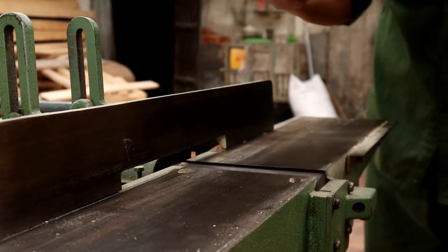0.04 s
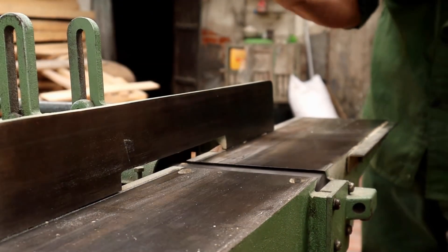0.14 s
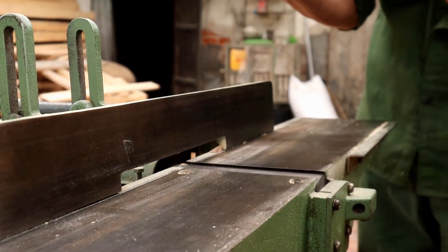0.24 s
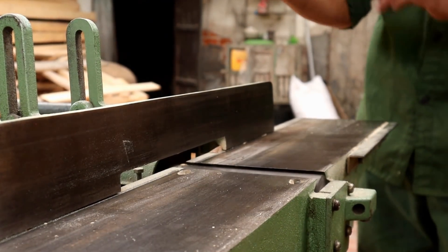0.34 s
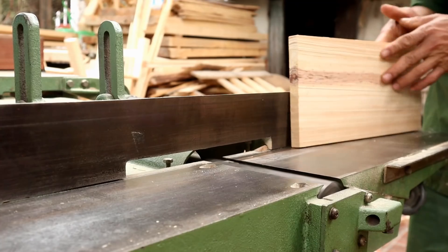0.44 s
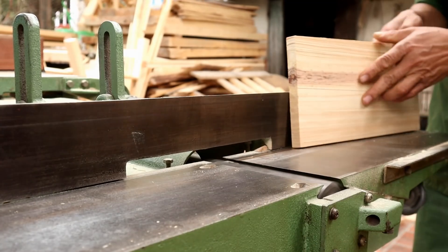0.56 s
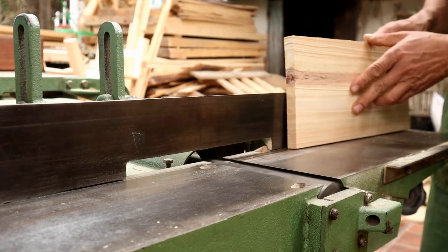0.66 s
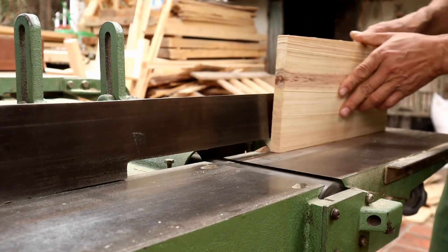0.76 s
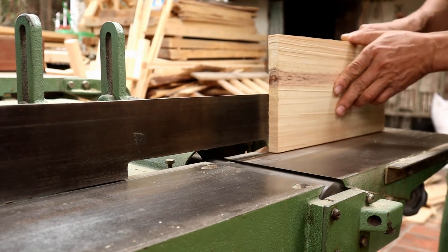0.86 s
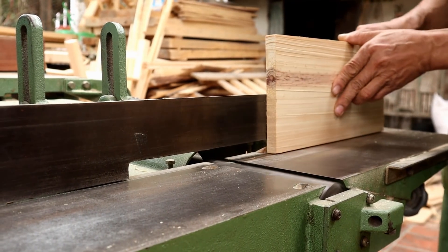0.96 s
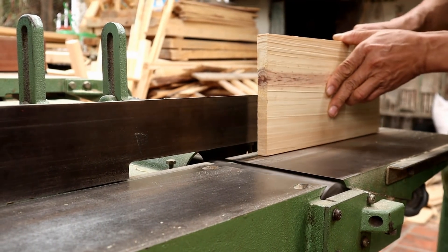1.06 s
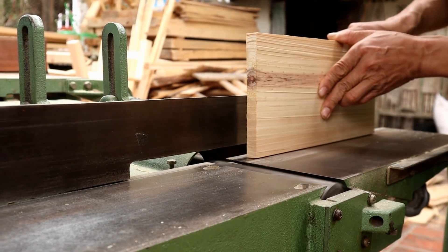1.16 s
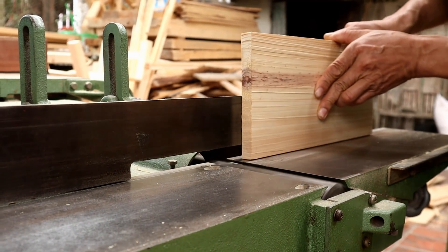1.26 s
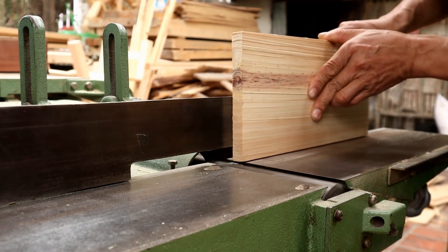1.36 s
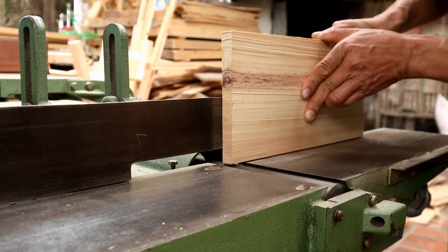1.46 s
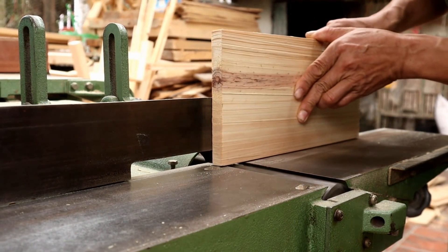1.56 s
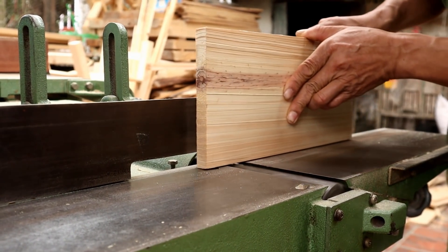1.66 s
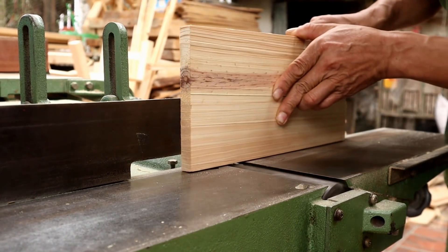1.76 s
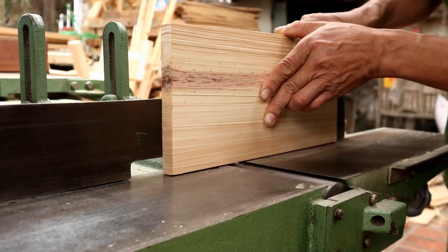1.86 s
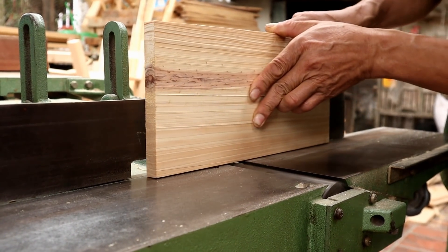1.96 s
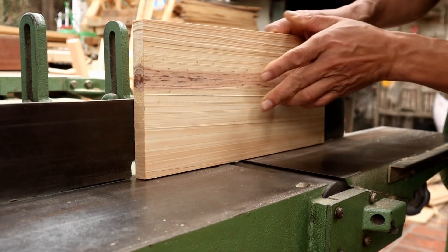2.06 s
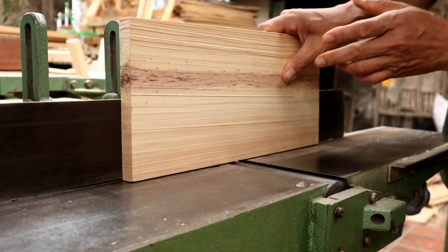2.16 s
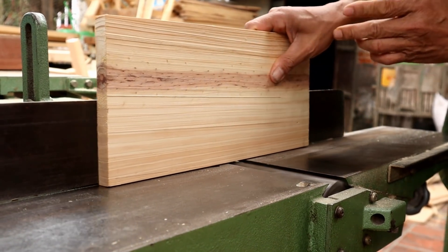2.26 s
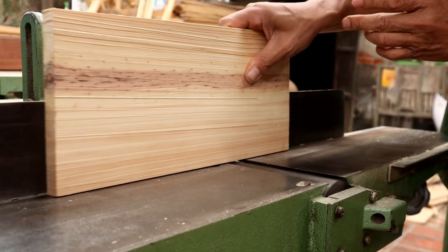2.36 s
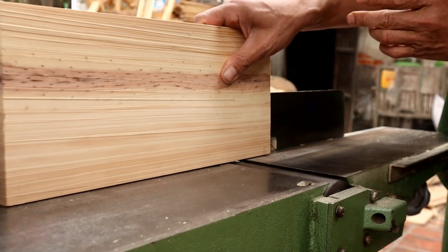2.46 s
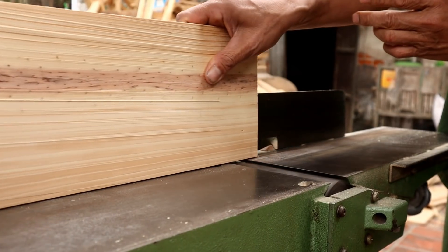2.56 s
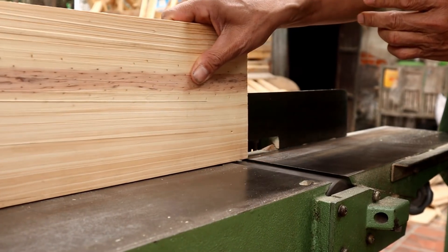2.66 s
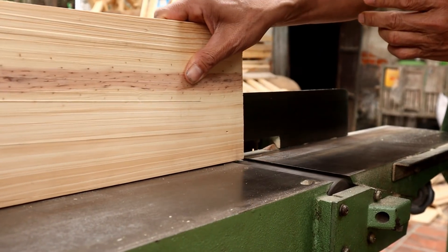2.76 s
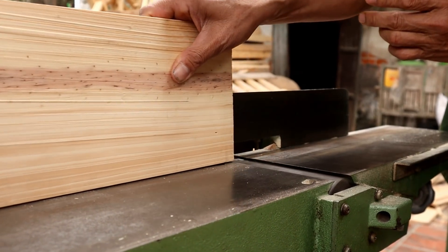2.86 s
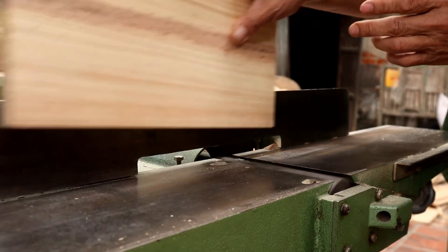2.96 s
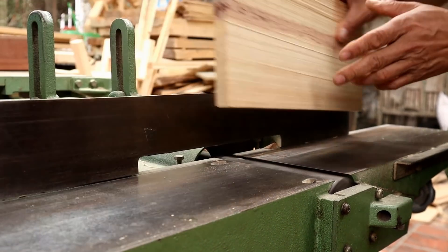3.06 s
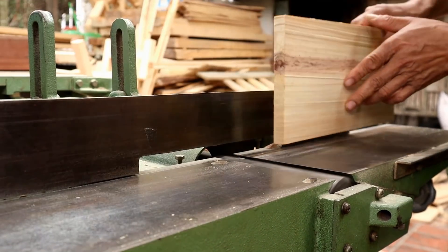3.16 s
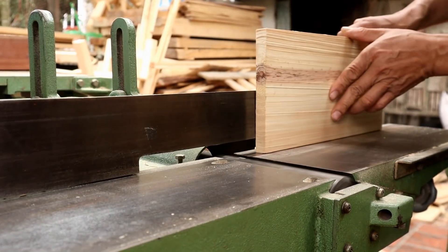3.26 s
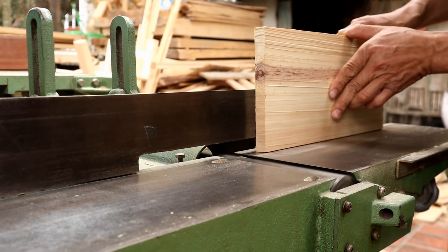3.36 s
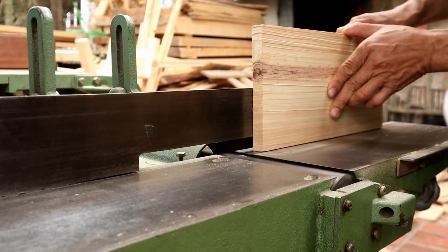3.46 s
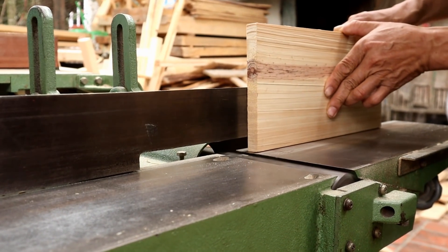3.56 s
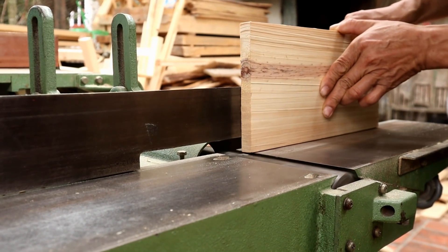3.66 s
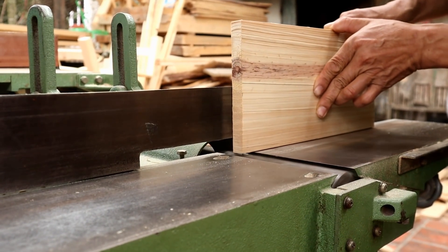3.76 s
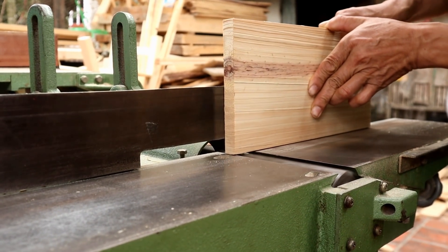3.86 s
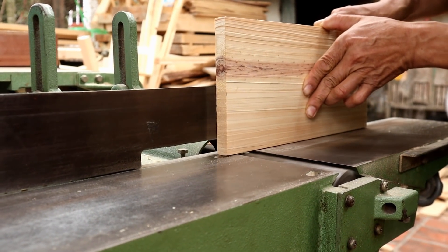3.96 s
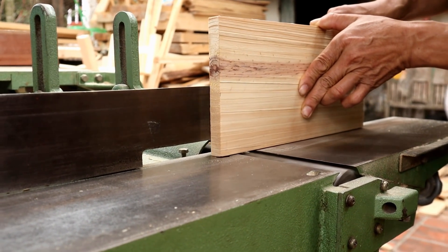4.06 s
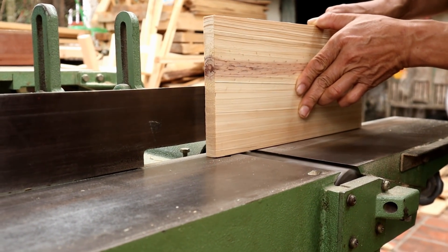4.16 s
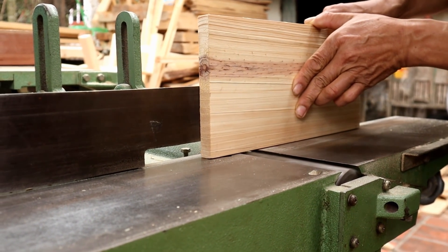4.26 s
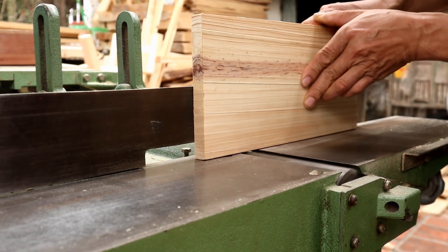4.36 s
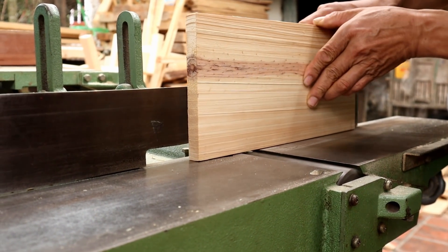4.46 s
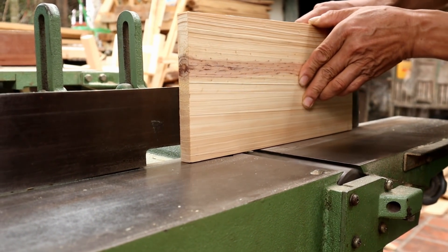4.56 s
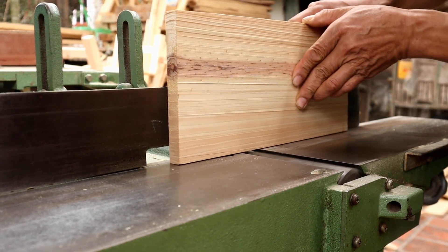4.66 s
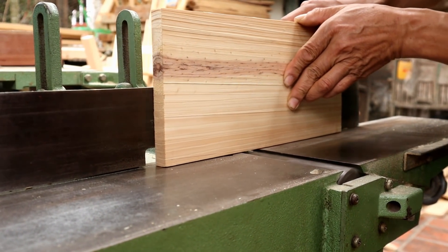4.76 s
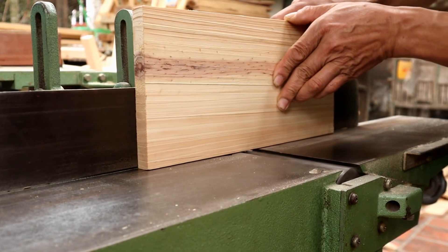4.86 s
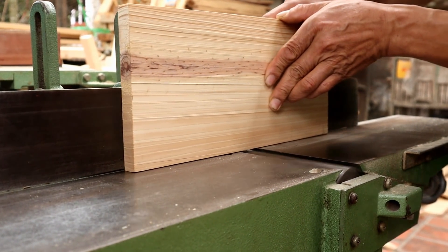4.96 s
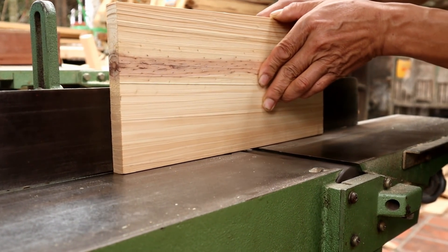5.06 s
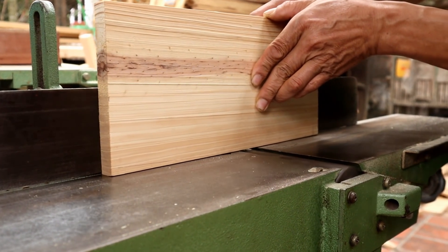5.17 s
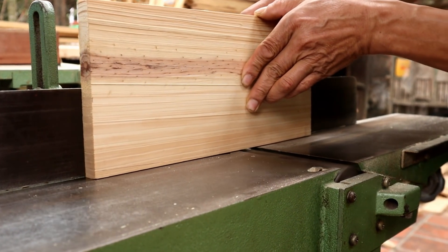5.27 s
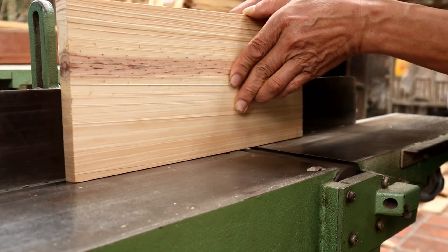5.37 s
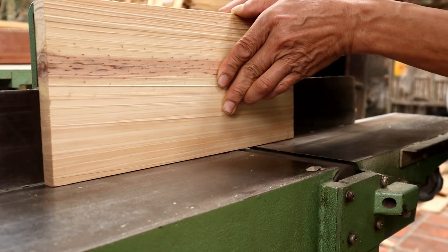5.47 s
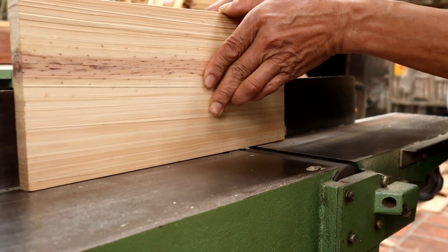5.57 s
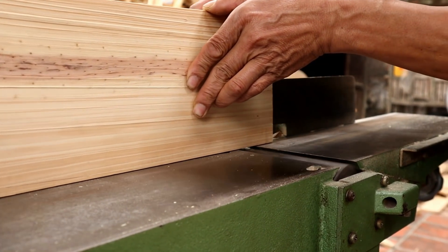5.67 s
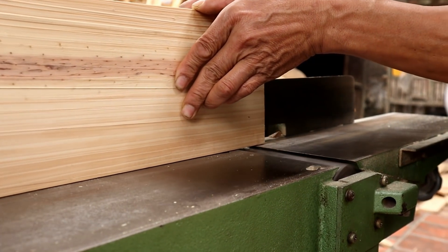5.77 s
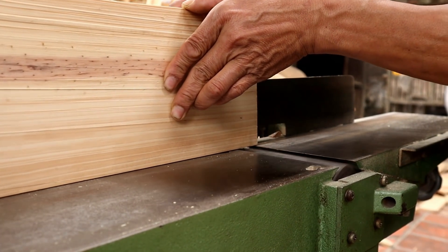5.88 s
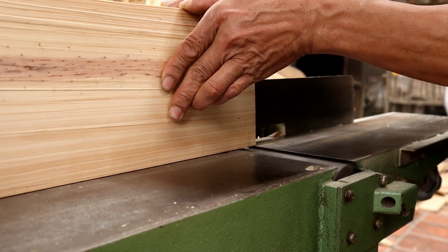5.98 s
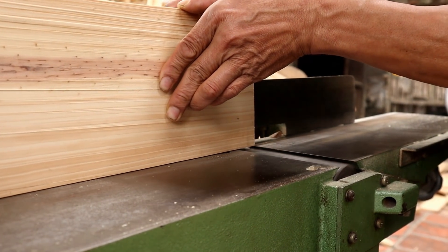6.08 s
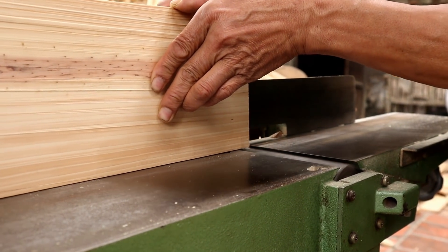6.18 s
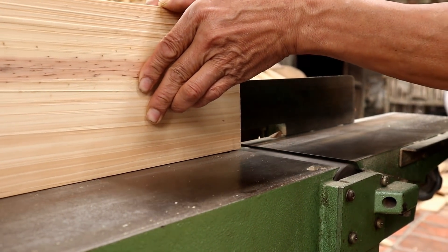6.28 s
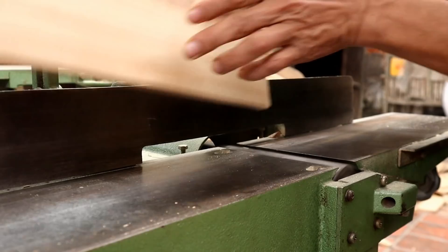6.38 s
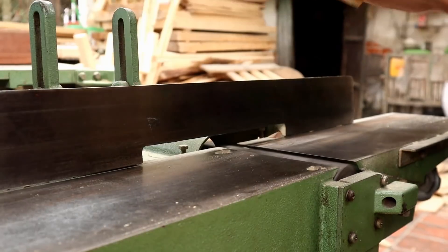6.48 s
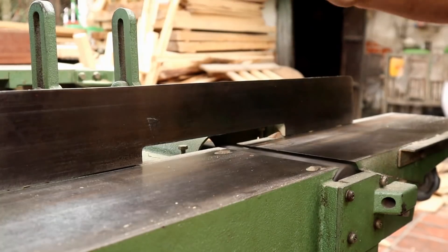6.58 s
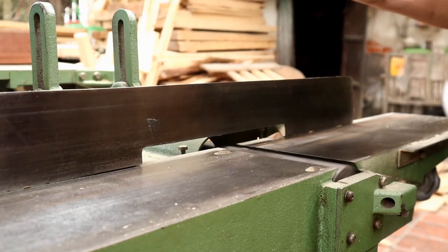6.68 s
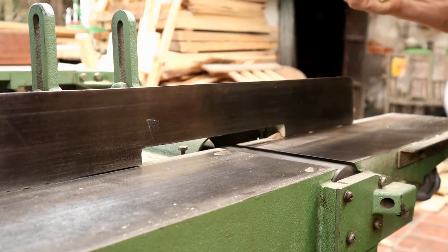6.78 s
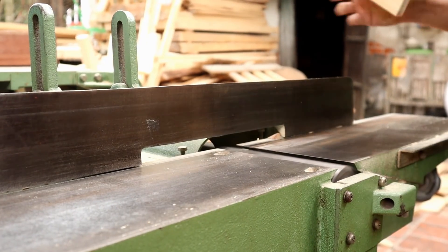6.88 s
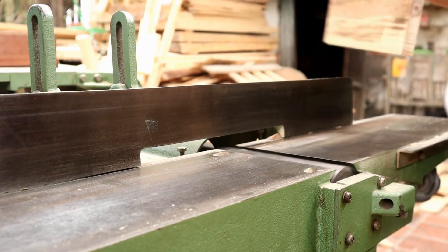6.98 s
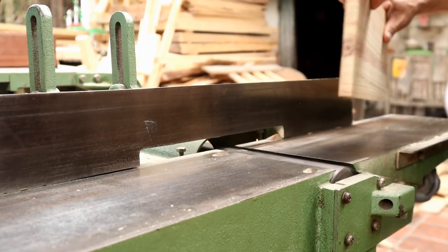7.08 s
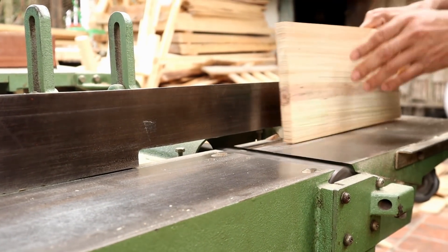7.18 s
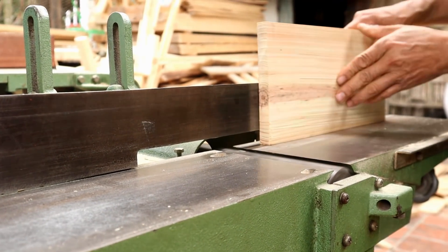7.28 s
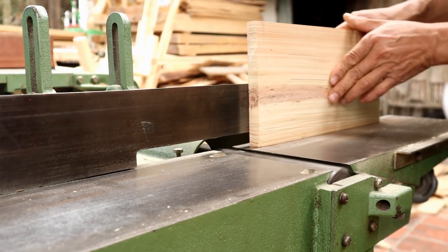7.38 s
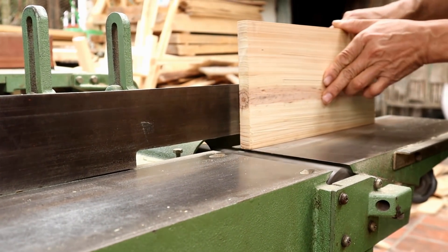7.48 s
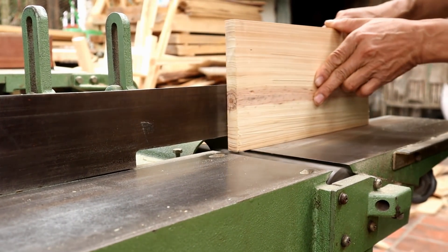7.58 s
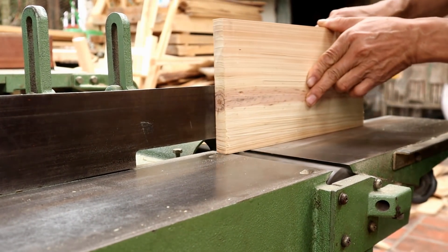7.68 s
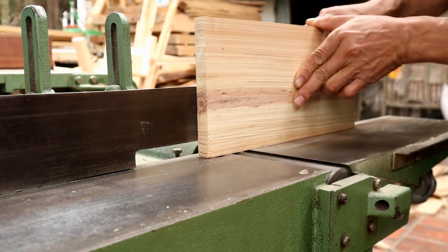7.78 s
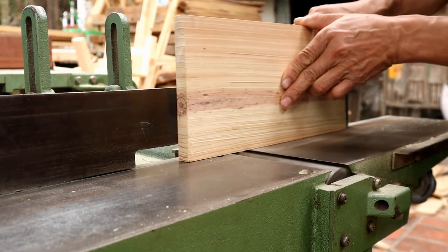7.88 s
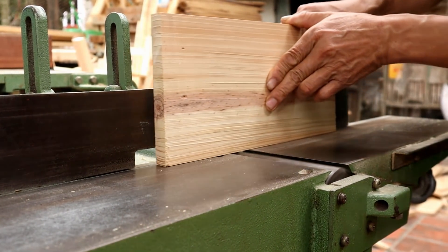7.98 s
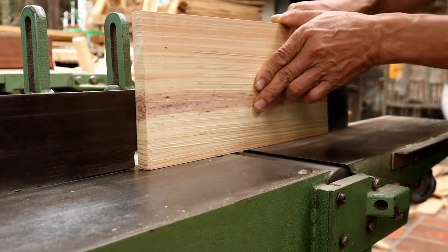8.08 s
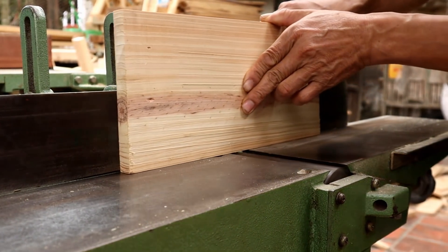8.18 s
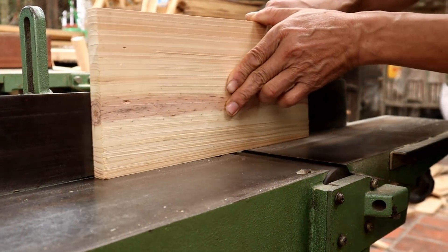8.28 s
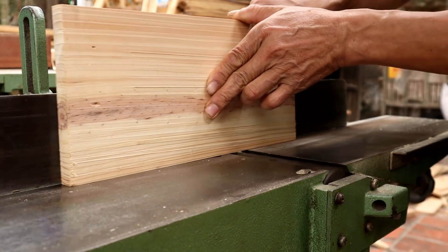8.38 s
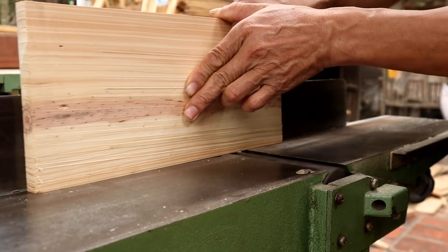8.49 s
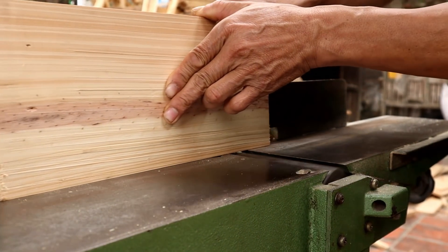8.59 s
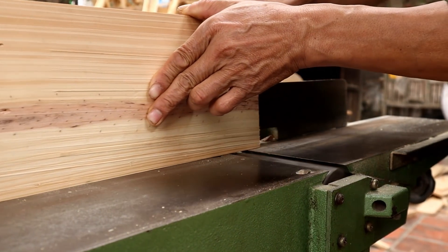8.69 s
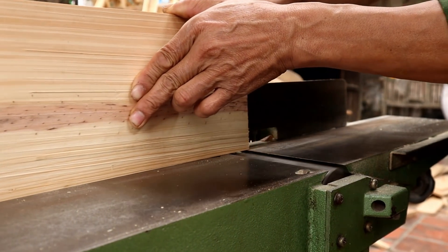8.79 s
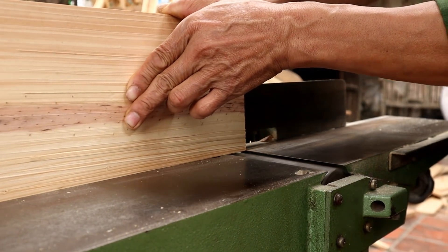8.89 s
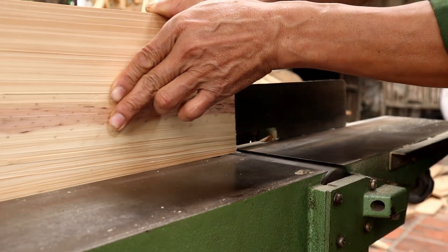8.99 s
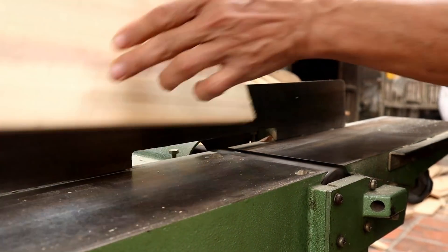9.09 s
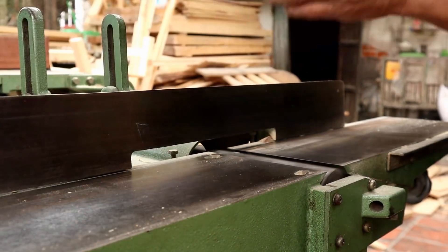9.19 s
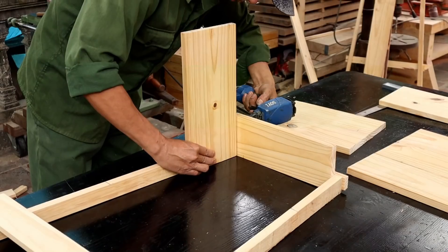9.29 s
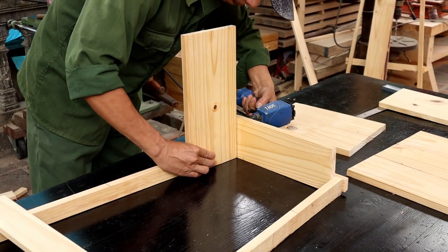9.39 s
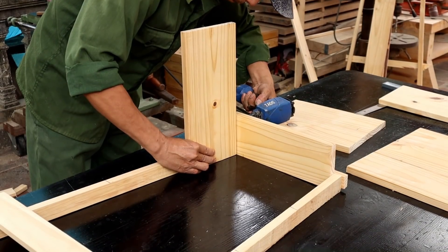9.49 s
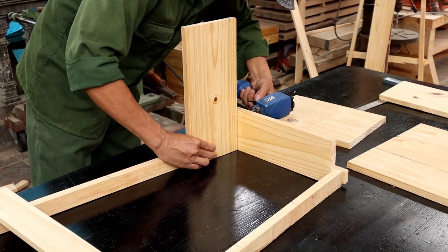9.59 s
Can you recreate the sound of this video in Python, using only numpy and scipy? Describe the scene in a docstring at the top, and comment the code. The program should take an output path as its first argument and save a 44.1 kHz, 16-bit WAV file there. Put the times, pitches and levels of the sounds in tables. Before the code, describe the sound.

A workshop jointer whines steadily with rattling iron while a pine board is fed through three rasping, squealing cuts; abrupt quiet, then one nail-gun shot.

```python
"""In a workshop a jointer whines while a pine board is fed three times over its two-knife cutter head.
Turning-rate tones make the whine, shaped noise the air, and one bite per turn, ringing, the cut.
Clicks ring resonances for the board's knocks, loose iron, and a hard chip cracking off on the second pass;
the board also scuffs and squeaks on the iron table. The machine sound ends abruptly;
in a quiet room a nail gun, clicks ringing a wooden frame plus a noise tail, drives one nail."""
import sys
import numpy as np
from scipy import signal
from scipy.fft import rfft, irfft, next_fast_len
from scipy.io import wavfile
from scipy.ndimage import uniform_filter1d

SR = 44100
rng = np.random.default_rng(int(sys.argv[2]) if len(sys.argv) > 2 else 0)


def put_to_file(sound):
    """Save the sound as 16-bit audio at rate SR, in the file named by the first command-line argument."""
    columns = np.atleast_2d(sound).T  # one column per channel
    safe = np.clip(columns, -1, 1)
    whole_steps = np.round(safe * 32767)
    wavfile.write(sys.argv[1], SR, whole_steps.astype(np.int16))


N = 425124
TIME = np.arange(N) / SR
STOP_S = 9.262  # end of the machine sound
BLOW_GAIN_DB = 22  # added to every blow level


def from_db(db):
    """Decibels to gain."""
    return 10 ** (np.asarray(db) / 20)


def rms_one(x):
    """Scale to unit power."""
    return x / np.sqrt(np.mean(x ** 2) + 1e-20)


def in_time(rows):
    """The columns of a curve table, interpolated at every sample."""
    s, *columns = np.transpose(rows)
    return [np.interp(TIME, s, c) for c in columns]


def during(start_s, end_s):
    """1 between two moments, with soft edges."""
    inside = (TIME >= start_s) & (TIME <= end_s)
    return uniform_filter1d(1. * inside, size=300)


def hump(s, half_s):
    """A smooth swell of height 1 around a moment."""
    return np.exp(-np.minimum(((TIME - s) / half_s) ** 2, 50))


def drift(rate_hz):
    """Slow random wander of unit power: noise through two equal one-pole lowpasses."""
    step = 40  # samples per slow point
    r = np.exp(-2 * np.pi * rate_hz * step / SR)
    noise = rng.standard_normal(N // step + 2002)
    slow = signal.lfilter([1], [1, -2 * r, r * r], noise)[2000:]
    return np.interp(np.arange(N) / step, np.arange(len(slow)), rms_one(slow))


def gain_at(points, hz):
    """Gain of a spectrum table at these frequencies, linear in dB over log frequency."""
    f, db = np.transpose(points)
    return from_db(np.interp(np.log(np.maximum(hz, 1)), np.log(f), db))


def colour(x, points):
    """Give a signal the shape of a spectrum table."""
    size = next_fast_len(N)
    gain = gain_at(points, np.fft.rfftfreq(size, 1 / SR))
    return irfft(rfft(x, size) * gain, size)[..., :N]


# Stereo width. Each row: frequency in Hz, side minus mid in dB.
STEREO_WIDTH = [(50, -18.5), (200, -53), (500, -16.5), (1200, -13.5), (2500, -8), (4500, -0.5), (9000, 4),
                (15000, 6.5)]


def stereo_noise(spectrum):
    """Noise that is alike at both ears in the bass and diffuse in the treble."""
    mid, side = colour(rng.standard_normal((2, N)), spectrum)
    return (mid + colour(side, STEREO_WIDTH) * [[1], [-1]]) / np.std(mid)


def partial(phase, hz, flutter):
    """One tone, fluttering in strength and phase, with a wandering part between the ears."""
    cos, sin = np.cos(phase), np.sin(phase)
    mid = cos * (1 + flutter * drift(22)) + sin * flutter * drift(16)
    side = gain_at(STEREO_WIDTH, hz) * sin * drift(1.6)
    return np.sqrt(2) * (mid + side * [[1], [-1]])


def tone(hz, rough_rad):
    """A sliding, slightly rough tone of unit power."""
    return np.sqrt(2) * np.sin(2 * np.pi * np.cumsum(hz) / SR + rough_rad * drift(150))


def resonate(x, modes):
    """Parallel two-pole resonances with alternating signs."""
    out = 0
    for k, (hz, width_hz, db) in enumerate(modes):
        r = np.exp(-np.pi * width_hz / SR)
        poles = [1, -2 * r * np.cos(2 * np.pi * hz / SR), r * r]
        ringing = (1 - r * r) / 2 * signal.lfilter([1, 0, -1], poles, x + 1e-18)
        out = out + (-1) ** k * from_db(db) * ringing
    return out


def ring(x, hz, width_hz):
    """A resonance with steep sides, whose centre may move: shift to 0 Hz, lowpass, shift back."""
    spin = np.exp(2j * np.pi * np.cumsum(hz * np.ones(x.shape[-1])) / SR)
    pole = np.exp(-2 * np.pi * width_hz / SR)
    return np.real(spin * signal.lfilter([1], [1, -2 * pole, pole * pole], x / spin))


def reflections(x, t60_s, delay_s):
    """Dense dying echoes, different at each ear, of unit gain."""
    t = TIME[:SR // 2]
    onset = np.clip((t - delay_s) * SR, 0, 1)
    echoes = rng.standard_normal((2, len(t))) * from_db(-60 * t / t60_s) * onset
    echoes /= np.sqrt(np.sum(echoes ** 2, axis=1, keepdims=True))
    return signal.fftconvolve(np.atleast_2d(x), echoes, axes=1)[:, :N]


def blows(events, modes, contact_s, crunch, room_db, t60_s, delay_s):
    """Each blow is a click with a brief crunch, duller when soft, that rings a body and then the room."""
    force = np.zeros((2, N))
    t = TIME[:SR // 50]
    for s, db, *bright_hz in events:
        mid, side = rng.standard_normal((2, len(t))) * np.exp(-t / contact_s)
        # differencing leaves mostly treble to differ between the ears
        push = crunch * (mid + .5 * np.diff(side, prepend=0) * [[1], [-1]])
        push[:, 0] += 1
        push /= np.sqrt(np.sum(push ** 2, axis=1, keepdims=True))
        soft = np.exp(-2 * np.pi * bright_hz[0] / SR) if bright_hz else 0
        push = signal.lfilter([1 - soft], [1, -soft], push)
        start = round(s * SR)
        force[:, start:start + len(t)] += from_db(db + BLOW_GAIN_DB) * push[:, :N - start]
    direct = resonate(force, modes)
    return direct + from_db(room_db) * reflections(direct, t60_s, delay_s)


# Cutter head speed, a little slower under load. Each row: time in seconds, speed in turns per second.
HEAD_SPEED = [(0, 197.6), (2.6, 197.3), (3.5, 197.45), (4.2, 197.15), (6.7, 197.6), (8.5, 197.2),
              (9.25, 197.45)]


def head_turn():
    """Angle of the cutter head in radians, with a little phase wander."""
    turns_per_s, = in_time(HEAD_SPEED)
    return 2 * np.pi * np.cumsum(turns_per_s) / SR + 0.02 * drift(21.8)


# The sliding board covers and uncovers the table gap, which voices the siren.
# Each row: time in seconds, levels of orders 2, 4, 6 and 8 in dB.
GAP_VOICING = [(0.0, -44.5, -68, -40.5, -50), (0.25, -44.5, -66, -47.5, -53), (0.38, -45, -60, -46.5, -55),
               (0.52, -47.5, -57.5, -50, -48), (0.95, -47, -51.5, -48.5, -45.5),
               (1.25, -46.5, -60, -46.5, -45.5), (1.6, -46.5, -60, -48, -45), (2.1, -46.5, -58, -45, -43),
               (2.6, -47.5, -67, -39.5, -43.5), (2.95, -48, -67, -41, -43),
               (3.3, -46.5, -57.5, -44.5, -43.5), (4.4, -46.5, -61, -45, -43.5),
               (5.3, -47, -53, -43.5, -42), (5.9, -48, -61.5, -44.5, -40.5), (6.5, -47, -62, -46, -42.5),
               (7.25, -47, -55.5, -46, -45), (8.1, -48, -61, -42, -43), (9.2, -48.5, -62, -45.5, -43.0)]
# Weaker orders of the head. Each row: multiple of the turning rate, level in dB before trim and waver.
WEAK_ORDERS = [(1, -62.5), (3, -70.5), (5, -61), (7, -74), (10, -58), (12, -52), (13, -62), (14, -54.5),
               (16, -61), (18, -56), (20, -57), (22, -66.5), (24, -66), (26, -65.5), (28, -65), (30, -66.5),
               (34, -85.5)]


def siren(turn):
    """The knives chop the air at the table lips; even orders dominate, each delayed by the housing."""
    lag_rad, dispersion_rad = 2.48, 0.0519
    weak_trim_db, waver_db, waver_hz = -2.0, 1.5, 2.2

    def order(k, flutter):
        """One multiple of the turning rate."""
        phase = k * turn + lag_rad + dispersion_rad * k * k
        return partial(phase, k * HEAD_SPEED[0][1], flutter)

    loud = sum(from_db(db) * order(k, flutter=0.11) for k, db in zip((2, 4, 6, 8), in_time(GAP_VOICING)))
    weak = sum(from_db(db + waver_db * drift(waver_hz)) * order(round(k), flutter=0.35)
               for k, db in WEAK_ORDERS)
    return loud + from_db(weak_trim_db) * weak


# The cuts. Each row: start in seconds, end in seconds, base level in dB, splinters and upper rings
# against it in dB, rise on breaking out of the trailing edge in dB (before the treble share).
CUT_PASSES = [(1.48, 2.837, -65.5, -7, 12), (3.746, 6.278, -62.5, 0, 6.5), (7.636, 9.049, -58.5, 0.5, 7)]
# Grain tearing out in fine splinters. Each row: time in seconds, length in seconds, treble rise in dB.
GRAIN_TEAR_OUTS = [(1.722, 0.0093, 20), (2.64, 0.074, 19), (5.95, 0.069, 4), (6.15, 0.14, -3),
                   (8.87, 0.022, 5)]


def cut_strength(bright=False):
    """Each pass bites in, grows toward the trailing end and breaks out; tear-outs lift mostly the treble."""
    growth_max_db, growth_s = 8, 0.4
    entry_db, entry_s = 1.5, 0.039
    exit_s, exit_lead_s = 0.017, 0.025
    tear_share, exit_share = (1, 0.94) if bright else (0.52, 1)  # of the rises in dB
    tear_db = tear_share * sum(db * hump(s, length_s / 2) for s, length_s, db in GRAIN_TEAR_OUTS)
    out = 0
    for start, end, db, bright_db, exit_db in CUT_PASSES:
        growth_db = growth_max_db * np.exp(-np.abs(end - TIME) / growth_s)
        edges_db = entry_db * hump(start, entry_s) + exit_db * exit_share * hump(end - exit_lead_s, exit_s)
        level_db = db + bright * bright_db + growth_db + edges_db + tear_db
        out = out + during(start, end) * from_db(level_db)
    return out


def bites(turn, jitter_s, uneven_db):
    """The knife that stands proud strikes the wood once a turn, a little unevenly."""
    turns = turn / (2 * np.pi)
    chance = rng.standard_normal((int(turns[-1]), 2))
    at = np.interp(np.arange(len(chance)), turns, np.arange(N)) + jitter_s * SR * chance[:, 0]
    taps = np.clip(at.astype(int)[:, None] + np.arange(-6, 7), 0, N - 1)
    clicks = np.zeros(N)
    # a sinc places each click between samples
    clicks[taps] = np.sinc(taps - at[:, None]) * from_db(uneven_db * chance[:, 1:])
    return clicks


def shifting_echoes(x, t60_s, shift_hz, count=5):
    """Close echoes between board, fence and table; their pattern changes as the board slides."""
    weights = np.array([drift(shift_hz) for _ in range(count)])
    weights /= np.sqrt(np.sum(weights ** 2, axis=0))
    return sum(weight * reflections(x, t60_s, 0) for weight in weights)


# A knife squeals in hard grain, gliding as the board slides on. Each row: start in seconds,
# length in seconds, first frequency in Hz, last frequency in Hz, width in Hz, level in dB.
KNIFE_SQUEALS = [(1.85, 0.36, 8800, 8700, 500, -68), (2.272, .13, 11800, 12700, 700, -57),
                 (2.38, 0.24, 8800, 7900, 600, -53.5), (2.48, 0.19, 5400, 5300, 1100, -50),
                 (2.595, 0.075, 9300, 9500, 500, -51), (2.665, 0.052, 8400, 8100, 800, -50),
                 (2.743, 0.095, 7750, 7540, 900, -48), (3.75, 0.66, 13000, 13000, 500, -61),
                 (4.86, .48, 15300, 15050, 500, -61), (5.094, 0.47, 8700, 8400, 400, -63),
                 (5.63, 0.2, 5040, 6450, 1100, -51), (5.78, .21, 13100, 12900, 500, -53),
                 (5.92, 0.077, 9900, 9700, 500, -52), (5.985, 0.12, 8150, 8240, 900, -52),
                 (6.08, 0.14, 10200, 10400, 900, -49.5), (6.232, .042, 7600, 7140, 1100, -57),
                 (7.66, 0.19, 8100, 8040, 500, -65), (7.885, 0.45, 8900, 8700, 448, -54),
                 (8.36, 0.53, 8530, 8550, 446, -47), (8.5, .4, 15300, 15500, 500, -52)]


def squeals(force, edge=0.42, lean=1.3):
    """One ring of the knife builds up out of the cut, holds evenly while it glides, and fades more quickly."""
    out = np.zeros((2, N))
    for start, length_s, first_hz, last_hz, width_hz, db in KNIFE_SQUEALS:
        span = (TIME > start) & (TIME < start + length_s)
        along = (TIME[span] - start) / length_s
        arch = np.abs(np.sin(np.pi * along ** lean)) ** edge
        ringing = ring(force[:, span], first_hz + (last_hz - first_hz) * along, width_hz)
        power = uniform_filter1d(np.mean(ringing ** 2, axis=0), size=1340)
        out[:, span] += from_db(db) * arch * ringing / np.sqrt(np.abs(power) + 1e-20)
    return out


# Board rasp. Each row: frequency in Hz, relative density in dB per Hz.
RASP_SPECTRUM = [(1200, -16.5), (2400, -5.5), (3800, 9), (5300, 10), (7000, 14), (9000, -17.5),
                 (12000, -18)]
# Fine splinters parting. Each row: frequency in Hz, relative density in dB per Hz.
SPLINTER_SPECTRUM = [(6000, -24), (8500, -1), (10000, -0.5), (11600, 0.5), (13000, -4), (14500, -2.5),
                     (16000, -9.5)]
# Rings all through a cut. Each row: frequency in Hz, width in Hz, level against the cut in dB.
STEADY_RINGS = [(8500, 1100, 0.5), (12900, 650, -6.5), (15200, 700, -11)]


def cutting(turn, rasp_db=2, splinter_db=0):
    """Every bite is a snap and a short tearing noise that ring board and knife; grain shifts the balance."""
    grain_db, grain_hz = 1.2, 4
    tear_s = 0.0006
    swell_db, swell_half_s, swell_lead_s = 4, 0.19, 0.46  # the rasp swells before each pass ends
    clicks = bites(turn, jitter_s=3e-6, uneven_db=1.2)
    tear_shape = signal.lfilter([1], [1, -np.exp(-1 / (tear_s * SR))], clicks)
    tearing = tear_shape * rng.standard_normal((2, N))
    force = 0.7 * clicks + shifting_echoes(clicks, t60_s=0.0045, shift_hz=2.0) + 0.075 * tearing
    force = force + 0.2 * reflections(force, t60_s=0.23, delay_s=0.001)
    parts = [(colour(force, RASP_SPECTRUM), rasp_db), (colour(force, SPLINTER_SPECTRUM), splinter_db)]
    parts += [(ring(force, hz, width_hz), db) for hz, width_hz, db in STEADY_RINGS]
    swayed = [from_db(db + grain_db * drift(grain_hz)) * rms_one(part) for part, db in parts]
    rasp, splinters, main_ring, *upper_rings = swayed
    swell = from_db(swell_db * sum(hump(end - swell_lead_s, swell_half_s) for _, end, *_ in CUT_PASSES))
    body = cut_strength() * (swell * rasp + main_ring)
    treble = cut_strength(bright=True) * (splinters + sum(upper_rings))
    return body + treble + squeals(force)


# Air churned by the head. Each row: frequency in Hz, relative density in dB per Hz.
WINDAGE_SPECTRUM = [(30, -47), (100, -20.5), (170, -17), (300, -4.5), (560, -5), (750, 0), (900, -5.5),
                    (1150, 0.5), (1950, -1), (2550, -2), (4300, -7.5), (8300, -16.5), (9700, -18),
                    (11300, -22.5), (16000, -29.5)]


def windage(turn, level_db=-43.5, puff=0.061, flicker_db=1.1):
    """Turbulence puffs with every knife, twice a turn, and flickers."""
    swell = from_db(level_db + flicker_db * drift(42))
    return stereo_noise(WINDAGE_SPECTRUM) * swell * (1 + puff * np.cos(2 * turn))


# Motor, belt and frame tones. Each row: frequency in Hz, level in dB before trim.
DRIVE_TONES = [(51, -86), (220.5, -63), (312.2, -65.5), (418, -64), (441.1, -61), (511, -65.5), (750, -60),
               (828, -66), (1095, -60.5)]


def drive(trim_db=-1):
    """Motor, belt and frame hum unevenly at fixed pitches."""
    return sum(from_db(db + trim_db) * partial(2 * np.pi * hz * TIME, hz, flutter=0.073)
               for hz, db in DRIVE_TONES)


# Hardest clinks of loose iron. Each row: time in seconds, level in dB before the blow gain.
HARD_CLINKS = [(1.3332, -35.5), (1.6665, -31), (1.82, -33), (1.9243, -33), (2.055, -33), (2.5922, -28),
               (2.927, -34), (3.0768, -33), (3.4645, -33.5), (3.949, -34), (4.27, -34.5), (4.5299, -33),
               (4.7244, -30.5), (6.3696, -35), (6.575, -36), (6.667, -31), (6.768, -30.5), (6.8528, -30),
               (6.962, -31), (7.047, -34), (7.4458, -33), (7.6262, -33), (7.7665, -37), (7.9185, -33),
               (8.014, -29.5), (8.9798, -32)]


def flaps(flaps_per_s=11):
    """Times of the soft belt flaps, spread evenly between the flaps that make the iron clink hard."""
    marks = [0] + [s for s, _ in HARD_CLINKS] + [STOP_S]
    runs = []
    for a, b in zip(marks, marks[1:]):
        steps = max(round((b - a) * flaps_per_s), 1)
        runs.append(np.linspace(a, b, steps + 1)[1:-1])
    return np.concatenate(runs)


# Buzz of the settling iron. Each row: frequency in Hz, width in Hz, relative level in dB.
BUZZ_MODES = [(2600, 550, 5), (3700, 900, 3), (5530, 390, 5), (7000, 2300, -8.5)]


def buzz(hits, touches_per_s=1500):
    """A dense run of tiny touches swells around each clink and dies away."""
    level_db, rise_s, fall_s = -14.5, 0.007, 0.018
    t = TIME[:SR // 8] - TIME[SR // 40]
    shape = np.exp(np.minimum(t / rise_s, -t / fall_s))
    swell = np.zeros(N + SR)
    for s, db in hits:
        start = max(round((s + t[0]) * SR), 0)
        swell[start:start + len(t)] += from_db(db + level_db) * shape
    touches = (rng.random(N) < touches_per_s / SR) * rng.standard_normal(N)
    echoed = touches + reflections(touches, t60_s=0.038, delay_s=0.0005)
    return swell[:N] * rms_one(resonate(echoed, BUZZ_MODES))


# Iron resonances. Each row: frequency in Hz, width in Hz, relative level in dB.
IRON_MODES = [(2150, 400, 3), (2580, 200, 14), (3450, 400, 2), (5800, 2500, -7)]


def rattle(taps_per_s=130, uneven_db=7.5, fine_db=-55):
    """Loose iron chatters: each belt flap sets off a clink and a short buzz, over a fine steady rattle."""
    soft_db, spread_db, late_s = -37, 4.0, 0.008
    tapped = rng.random(N) < taps_per_s * from_db(2 * drift(8)) / SR
    taps = tapped * from_db(uneven_db * np.clip(rng.standard_normal(N), -2, 1.5))
    fine = resonate(taps, IRON_MODES)
    times = flaps()
    chance = rng.uniform(-1, 1, (len(times), 2))
    hits = [(s, db) for s, db in HARD_CLINKS]
    hits += [(s + late_s * late, soft_db + spread_db * strong) for s, (late, strong) in zip(times, chance)]
    clinks = blows(hits, IRON_MODES, contact_s=0.0028, crunch=0.18, room_db=1, t60_s=0.18, delay_s=0.0037)
    buzzing = buzz(hits)
    fine = fine + 0.5 * reflections(fine, t60_s=0.25, delay_s=0.0068)
    return clinks + buzzing + from_db(fine_db) * rms_one(fine)


# Brief dips in level. Each row: time in seconds, change in dB.
LEVEL_DIPS = [(0.434, -7), (0.802, -5), (1.256, -5), (4.891, -9), (8.529, -5)]


def dips(half_s=0.0052):
    """The level drops for a few milliseconds now and then."""
    return from_db(sum(db * hump(s, half_s) for s, db in LEVEL_DIPS))


# Board on table and fence. Each row: time in seconds, level in dB before the blow gain, brightness in Hz.
BOARD_KNOCKS = [(0.4974, -17.5, 12000), (3.2595, -19, 7000), (3.8335, -16, 6000), (7.2412, -24, 4000),
                (7.2620, -20, 3000)]
# Board resonances. Each row: frequency in Hz, width in Hz, relative level in dB.
BOARD_MODES = [(650, 300, -8), (1350, 260, 2), (2020, 220, 0), (3000, 110, 6), (4200, 1200, -8),
               (6200, 1500, -14)]


def knocks():
    """The board strikes table and fence and rings."""
    return blows(BOARD_KNOCKS, BOARD_MODES, contact_s=.0016, crunch=.18, room_db=-5, t60_s=.14, delay_s=.003)


# Board scuffing along the fence. Each row: time in seconds, length in seconds, level in dB.
FENCE_SCUFFS = [(0.496, 0.02, -34), (3.27, 0.055, -40.5), (3.838, 0.055, -43.5), (7.25, 0.026, -45),
                (7.327, 0.022, -40)]


def scuffs(slips_per_s=900, room_db=-4):
    """Dense tiny slips ring the board."""
    slips = (rng.random(N) < slips_per_s / SR) * rng.standard_normal(N)
    swell = sum(from_db(db) * hump(s, length_s / 2) for s, length_s, db in FENCE_SCUFFS)
    rubbed = rms_one(resonate(slips, BOARD_MODES)) * swell
    return rubbed + from_db(room_db) * reflections(rubbed, t60_s=0.17, delay_s=0.0024)


# Board skidding on the table. Each row: time in seconds, frequency in Hz, level in dB.
SKID = [(.935, 895, -65), (.953, 868, -46), (.972, 838, -37), (0.986, 744, -42), (1.005, 716, -43)]


def squeak():
    """The board skids on the table, a rough tone falling in pitch."""
    hz, db = in_time(SKID)
    return during(SKID[0][0], SKID[-1][0]) * from_db(db) * tone(hz, rough_rad=0.56)


def from_right(x, pan_db, lag_s):
    """A source to the right reaches the left ear weaker and later."""
    left = np.interp(TIME - lag_s, TIME, x[0])
    return np.array([left, x[1]]) * from_db([[-pan_db], [pan_db]])


# Hard chip cracking off and rebounding.
# Each row: time in seconds, level in dB before the blow gain, brightness in Hz.
CHIP_CRACKS = [(4.1221, -8.5, 15900), (4.1293, -19, 16000), (4.1352, -25, 6000), (4.1422, -22, 12000),
               (4.1500, -26, 5000), (4.1665, -25, 4000)]
# Chip resonances. Each row: frequency in Hz, width in Hz, relative level in dB.
CHIP_MODES = [(1690, 220, -1.5), (2080, 200, -7), (2750, 340, -4), (3290, 210, 9), (3980, 308, 1.5),
              (4610, 200, 1), (5200, 400, 2), (6100, 400, 5), (7540, 350, -2.5), (8400, 500, -2.5),
              (9500, 540, -5), (11300, 350, -5), (14000, 2000, -16)]


def chip():
    """A hard chip cracks off to the right and rebounds, ringing."""
    cracks = blows(CHIP_CRACKS, CHIP_MODES, contact_s=0.0011, crunch=0.09, room_db=-2.5,
                   t60_s=0.13, delay_s=0.0065)
    return from_right(cracks, pan_db=0.8, lag_s=4.5e-5)


# Driver, nail going home and recoil.
# Each row: time in seconds, level in dB before the blow gain and pan, brightness in Hz.
NAIL_BLOWS = [(9.6072, -17, 6100), (9.60812, -13, 15800), (9.6132, -29, 16000)]
# Frame resonances. Each row: frequency in Hz, width in Hz, relative level in dB.
FRAME_MODES = [(366, 43, 1), (592, 80, 8), (1080, 190, 3.5), (1550, 190, 11), (2170, 180, -13),
               (3020, 230, 0), (4400, 410, 1), (5160, 240, 2), (7350, 260, 7), (8550, 250, -4),
               (9740, 260, 7.5), (10860, 300, -1), (12900, 700, 0), (15400, 400, -11)]


def nail_gun(blast_db=-9, blast_t60_s=0.24, blast_low_hz=260, blast_top_hz=6000):
    """The nail rings the frame, and the gun's crack fills the room, dulled by the walls."""
    frame = blows(NAIL_BLOWS, FRAME_MODES, contact_s=0.00061, crunch=0.036, room_db=-5.5,
                  t60_s=0.31, delay_s=0.0023)
    nail_s, nail_db, _ = NAIL_BLOWS[1]
    impulse = 1. * (np.arange(N) == round(nail_s * SR))
    crack = reflections(impulse, blast_t60_s, delay_s=0.00089)
    crack = signal.sosfilt(signal.butter(2, blast_low_hz, "high", fs=SR, output="sos"), crack)
    crack = signal.sosfilt(signal.butter(1, blast_top_hz, fs=SR, output="sos"), crack)
    return (frame + from_db(nail_db + BLOW_GAIN_DB + blast_db) * crack) * from_db([[-.9], [.9]])


# Frame nudged on the bench. Each row: time in seconds, level in dB before the blow gain, brightness in Hz.
FRAME_NUDGES = [(9.4186, -47.5, 2990)]
# Bench resonances. Each row: frequency in Hz, width in Hz, relative level in dB.
BENCH_MODES = [(403, 45, 9), (713, 66, -2), (1050, 60, 0), (1510, 160, -0.5), (1780, 140, -2)]


def nudge():
    """The frame is nudged and rings the bench."""
    return blows(FRAME_NUDGES, BENCH_MODES, contact_s=.003, crunch=0.086, room_db=-3,
                 t60_s=0.22, delay_s=0.0029)


# Faint high chirps. Each row: time in seconds, top frequency in Hz, level in dB.
HIGH_CHIRPS = [(9.409, 8000, -75), (9.428, 7450, -76), (9.547, 7850, -74), (9.567, 7370, -76)]


def chirps(half_s=0.0077, sag_hz=400):
    """Each chirp arches in pitch and level together."""
    out = 0
    for s, top_hz, db in HIGH_CHIRPS:
        arch = hump(s, half_s)
        out = out + from_db(db) * arch * tone(top_hz - sag_hz * (1 - arch), rough_rad=.8)
    return out


# Quiet room. Each row: frequency in Hz, relative density in dB per Hz.
ROOM_SPECTRUM = [(24, -38), (40, -30), (100, -25), (140, -16), (190, -12), (250, -18), (420, -19),
                 (630, -21), (1500, -25), (3000, -31), (6000, -31), (8500, -37), (15000, -42)]


def quiet_room(rumble_db=-77.5, hum_hz=169, hum_db=-74.5):
    """A faint rumble of shaped noise with a low hum."""
    rumble = from_db(rumble_db) * stereo_noise(ROOM_SPECTRUM)
    return rumble + from_db(hum_db) * partial(2 * np.pi * hum_hz * TIME, hum_hz, flutter=0.3)


def scene():
    """The running jointer, then the quiet assembly bench."""
    turn = head_turn()
    machine = siren(turn) + drive() + windage(turn) + cutting(turn)
    board = knocks() + scuffs() + squeak()
    jointer = (machine + rattle()) * dips() + board + chip()
    bench = nail_gun() + nudge() + chirps() + quiet_room()
    running = np.clip((STOP_S - TIME) / .004 + .5, 0, 1)  # 4 ms crossfade
    return (running * jointer + (1 - running) * bench) * from_db([[-.2], [.2]])


def record(dry):
    """The top is cut steeply by an elliptic lowpass at 15850 Hz."""
    return signal.sosfilt(signal.ellip(12, .1, 80, 15850, fs=SR, output="sos"), dry)


dry = scene()
out = record(dry)
put_to_file(out)
```